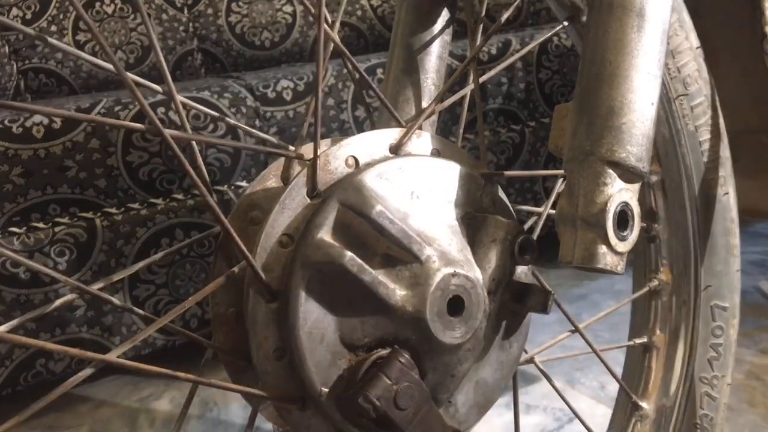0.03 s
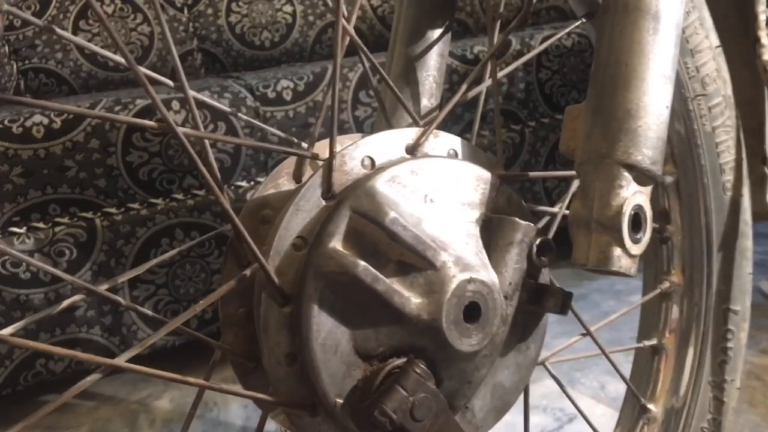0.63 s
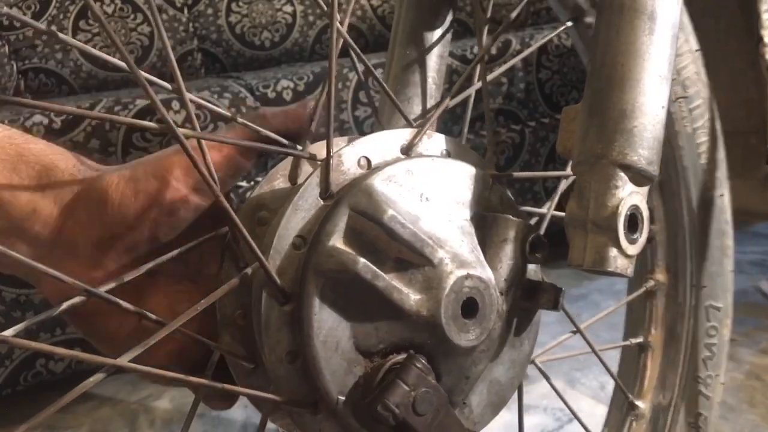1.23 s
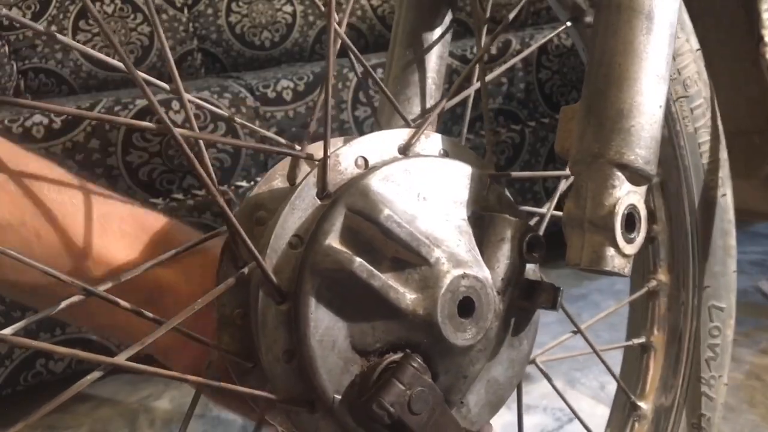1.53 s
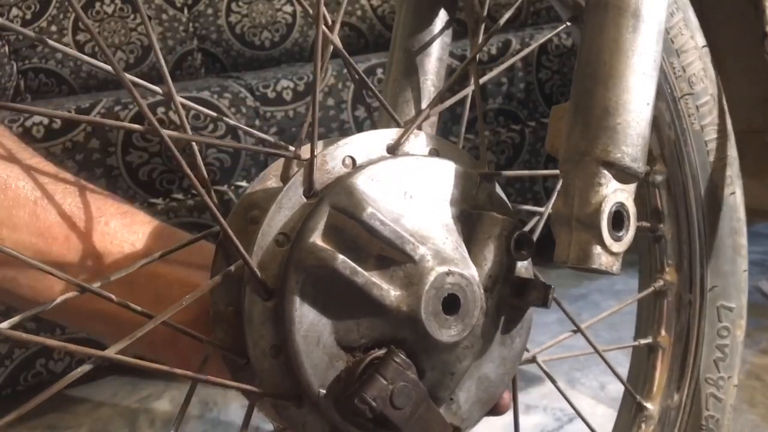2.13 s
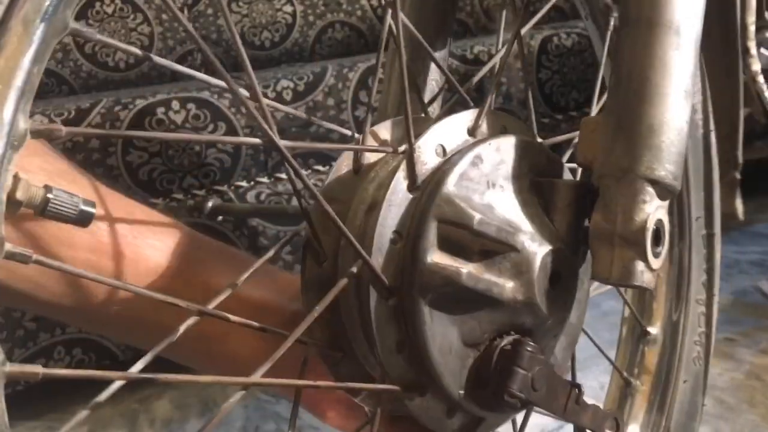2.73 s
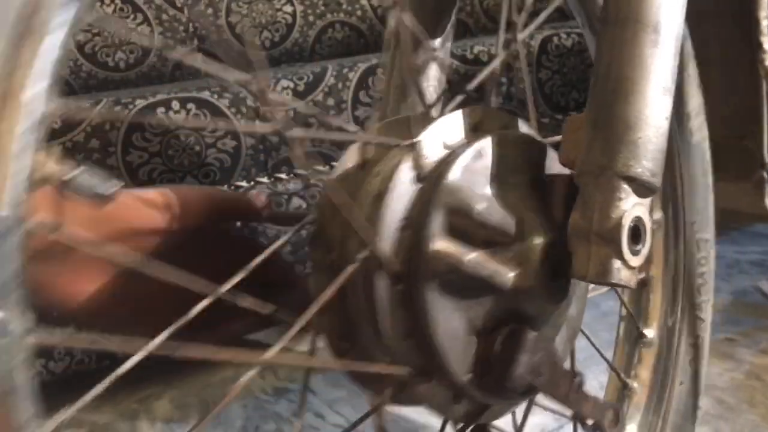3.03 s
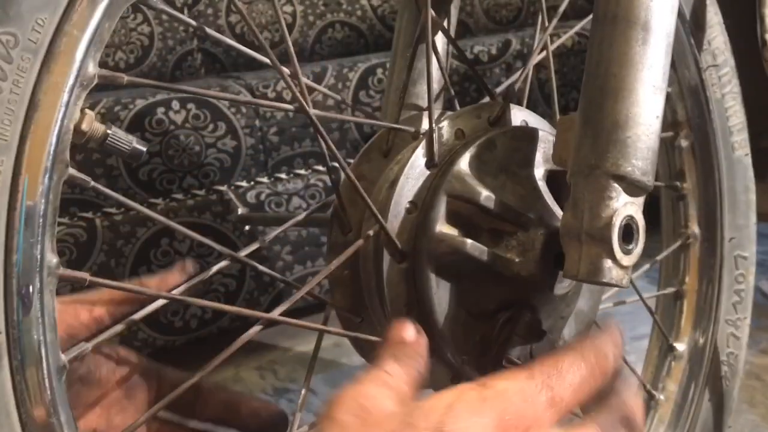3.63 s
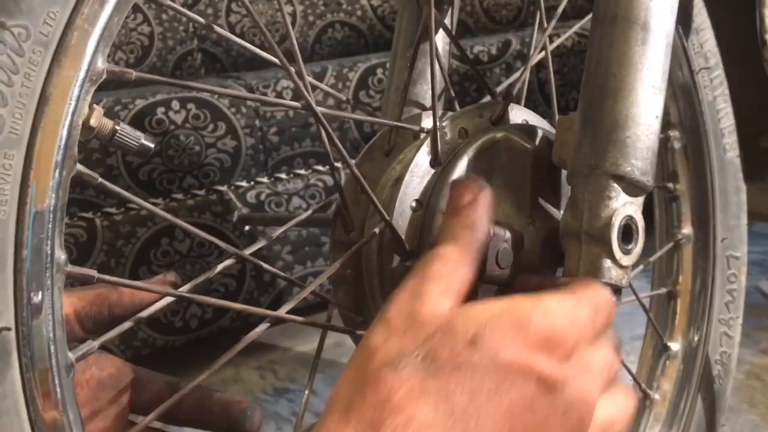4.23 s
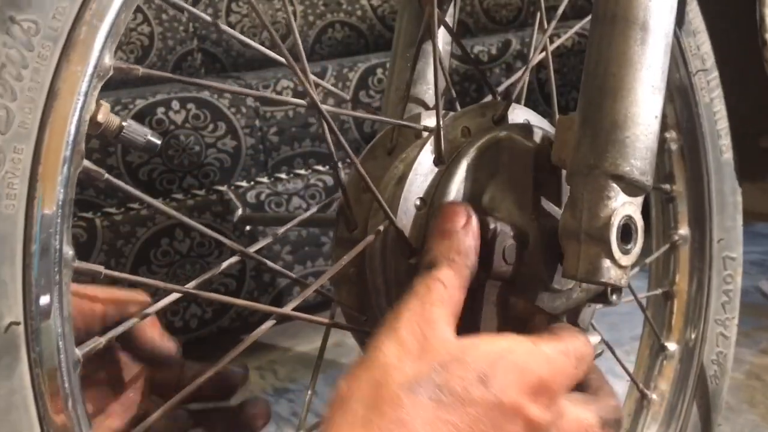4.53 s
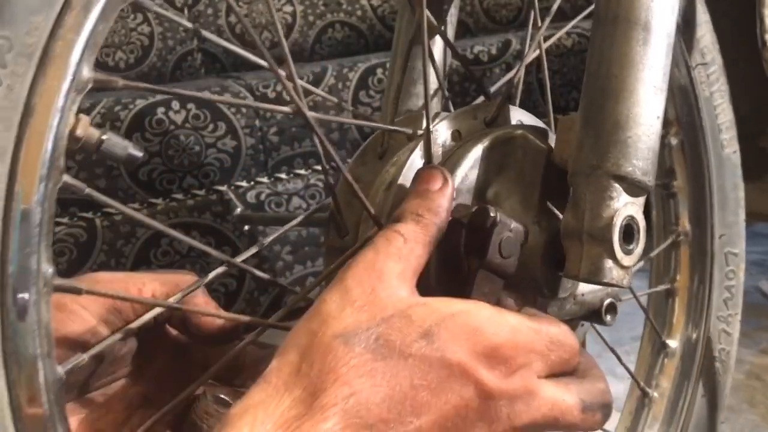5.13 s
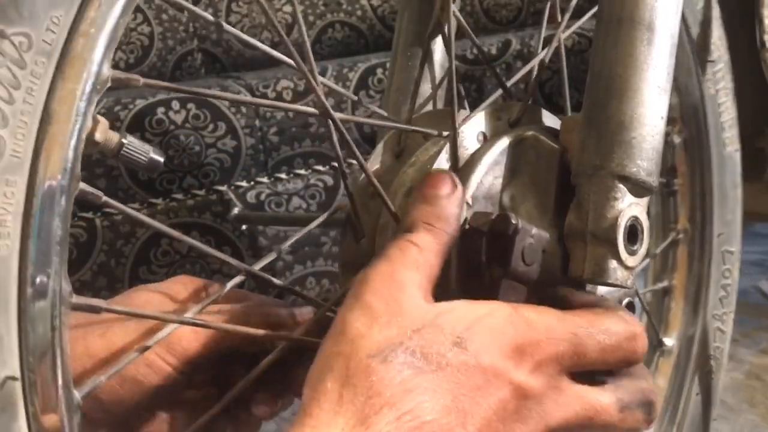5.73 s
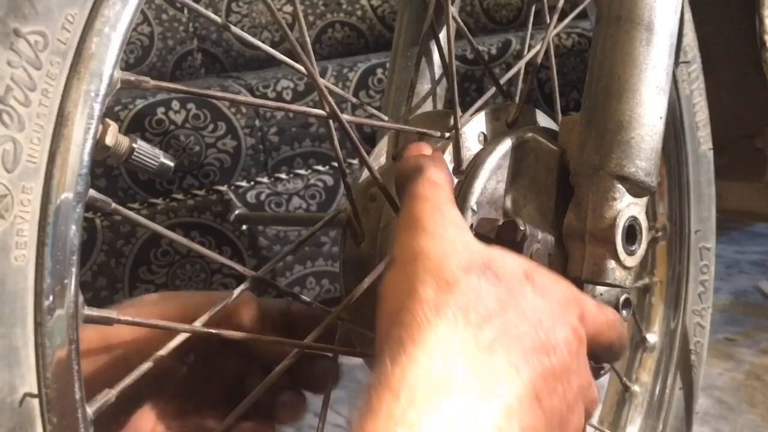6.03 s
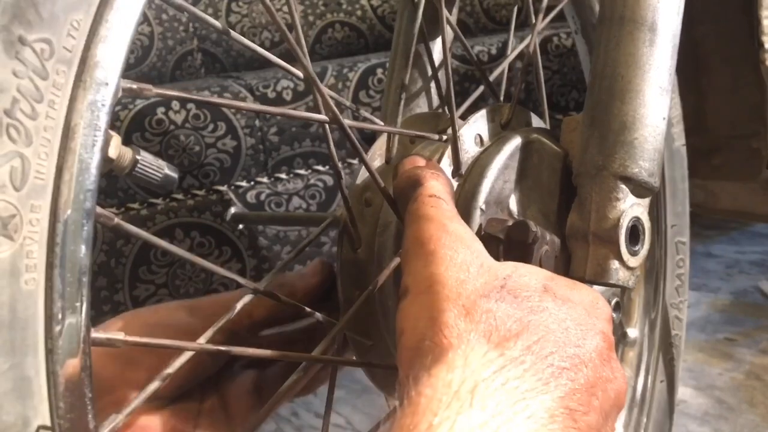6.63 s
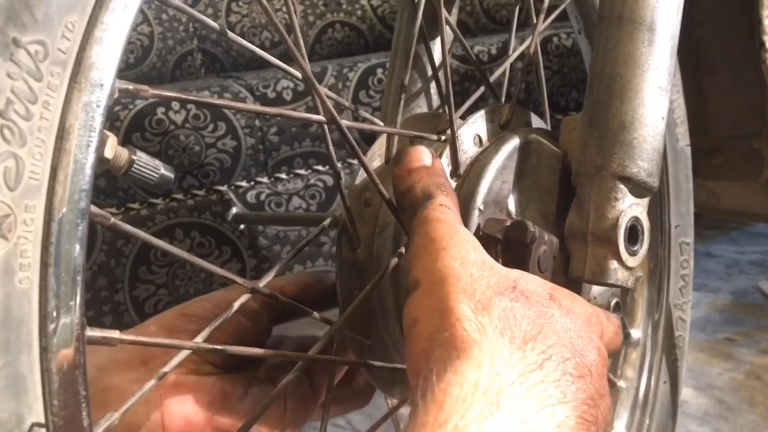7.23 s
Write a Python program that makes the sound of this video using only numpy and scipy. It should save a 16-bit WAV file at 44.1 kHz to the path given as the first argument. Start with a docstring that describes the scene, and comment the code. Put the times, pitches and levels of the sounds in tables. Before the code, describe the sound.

Close up in a small workshop, hands rub softly on a motorcycle wheel while fitting its brake plate. After a quiet start come irregular metallic clicks and clunks, some with a short scrape or a clear ping, and the hub rings faintly behind them. The knocks bunch together past the middle, then thin out to small taps over a low room hum.

```python
"""A small workshop, a phone microphone close to a motorcycle wheel. The drum brake plate is turned and
seated by hand in the hub: each contact scrapes in, rocks the hand-damped plate, thuds through the wheel
and rings the casting. Fingers tick, clear metal tones ping on some contacts and hands rustle on the metal.
The hub rings on faintly, and the near walls answer briefly over a quiet background."""
import sys
import numpy as np
from scipy import signal
from scipy.fft import rfft, irfft
from scipy.io import wavfile
from scipy.ndimage import uniform_filter1d

SR = 44100
rng = np.random.default_rng(int(sys.argv[2]) if len(sys.argv) > 2 else 0)


def output_pcm(signal):
    """Save a mono or channel-first signal as 16-bit PCM at the path in sys.argv[1].

    Samples are clipped to [-1, 1] before scaling.
    """
    pcm = np.clip(np.atleast_2d(signal).T, -1, 1) * 32767
    wavfile.write(sys.argv[1], SR, np.round(pcm).astype(np.int16))


N = 325458
LEAD_S, LENGTH_S = .06, .3  # each contact's sound starts a little before the faces meet
AGE = np.arange(int(LENGTH_S * SR)) / SR - LEAD_S  # seconds since the contact
# The casting's many small modes ripple the spectrum of every rub in the same way.
MODE_SPACING_HZ = 110
RIPPLE = rng.standard_normal(int(SR / 2 / MODE_SPACING_HZ) + 2)

# Contacts of plate, lever and hub. Each row: time in seconds, metal level in dB, brightness in dB per
# octave, scrape-in time and contact t60 in seconds, place along the rim from 0 to 1, rocking pitch in Hz,
# rocking level in dB, hiss in dB. Levels are relative.
KNOCKS = [(0.274, -65, -3, 0.0026, 0.051, .063, 393, -73.5, -59.5),
          (1.9697, -36.5, 3.5, .00025, .026, .438, 535, -34.5, -70),
          (2.1854, -46, -7, .0004, 0.019, .41, 418, -34, -43),
          (2.206, -56.5, 2, 0.0021, 0.038, .244, 480, -50, -48),
          (2.962, -38.5, -5.5, 0.0028, 0.039, .38, 462, -36.5, -36.5),
          (3.139, -73, -4, .0015, .088, .2, 410, -70, -65.5),
          (3.195, -74, -7, .0016, .04, .368, 500, -64, -65),
          (3.236, -66, 2, .002, 0.039, .09, 445, -63, -75),
          (3.479, -57.5, 3, 0.0028, .13, .216, 400, -36, -54),
          (3.7031, -32, -4, .0004, 0.031, .29, 521, -23.5, -50.5),
          (3.771, -49, -5.5, .009, 0.072, 0, 560, -43, -53.5),
          (3.861, -37, 6, .0003, 0.031, .1, 501, -23.5, -41.5),
          (3.919, -57, -1, 0.0015, 0.019, .47, 507, -39, -58.5),
          (4.075, -64.5, -5, .004, .05, .42, 497, -50, -60.5),
          (4.4331, -52, -15, .0015, 0.086, .18, 473, -26.5, -44.5),
          (4.5554, -51.5, -17, .0005, 0.068, .18, 497, -27, -49),
          (4.736, -48.5, -3, 0.00036, 0.042, .146, 456.6, -39, -51.5),
          (4.775, -52, -1.5, 0.0042, .044, .13, 496, -46, -63.5),
          (4.8055, -31, -4.5, .0039, .045, .48, 552, -28, -44),
          (4.8222, -34.5, -7, .0045, .052, .488, 554, -23.5, -51),
          (4.83, -42, -3.5, .001, .018, .3, 545, -31.5, -53.5),
          (4.848, -44, -2.5, .004, .024, .073, 410, -51, -55),
          (4.861, -51, -6, .0015, .035, .3, 582, -34.5, -53),
          (5.0107, -52.5, -21.5, .0008, 0.022, .38, 568, -38, -52.5),
          (5.185, -35.5, -10, .0055, 0.064, .063, 580, -28, -44),
          (5.32, -67, -13, .0038, .043, .15, 572, -62, -72),
          (5.666, -54, -4.5, .0012, 0.11, .26, 458, -26, -51.5),
          (6.4941, -59.5, -2.5, .0025, .037, .178, 492, -43.5, -61),
          (6.998, -57, -3, .002, 0.045, .15, 624, -58, -61),
          (7.194, -61, -2.5, .0019, 0.059, .098, 445, -62, -59)]
# How busily the hands work. Each row: time in seconds, level of their rubbing in dB.
EFFORT = [(.4, -79.5), (1.5, -87), (2.3, -72), (2.8, -84.5), (3.6, -72.5), (4.3, -75.5), (5.2, -75),
          (5.9, -82), (7.3, -78.5)]


def undb(db):
    """Decibels to gain."""
    return 10 ** (np.asarray(db) / 20)


def fade(t, t60):
    """Exponential decay from t = 0."""
    return np.exp(-np.log(1000) * np.maximum(t, 0) / t60)


def band(x, lo_hz, hi_hz, order=3):
    """Causal band-pass."""
    sos = signal.butter(order, [lo_hz, min(hi_hz, SR / 2 - 1)], "band", fs=SR, output="sos")
    return signal.sosfilt(sos, x)


def burst(x, db=0):
    """Scale a short sound to the energy of 20 ms at this level."""
    return x * undb(db) * np.sqrt(.02 * SR / (np.sum(x ** 2) + 1e-18))


def curve(rows):
    """Gain over time from rows of seconds and dB."""
    return undb(np.interp(np.arange(N) / SR, *np.transpose(rows)))


def bump(s, half_s):
    """A smooth swell of height 1 around s."""
    return np.exp(-((np.arange(N) / SR - s) / half_s) ** 2)


def colour(x, points):
    """Shape noise by points of Hz and dB; rms 1."""
    hz, db = np.transpose(points)
    log_hz = np.log(np.fft.rfftfreq(len(x), 1 / SR) + 1)
    y = irfft(rfft(x) * undb(np.interp(log_hz, np.log(hz), db)), len(x))
    return y / y.std()


def add(track, sound, s):
    """Mix in a sound whose contact falls at s."""
    start = int((s - LEAD_S) * SR)
    a, b = max(start, 0), min(start + len(sound), N)
    track[a:b] += sound[a - start:b - start]


def mode(push, hz, t60, phase=0):
    """A resonance that gathers a push and lets it die away."""
    swing = signal.lfilter([1], [1, -fade(1 / SR, t60)], push)
    return swing * np.sin(2 * np.pi * hz * AGE + phase)


def blow(rise_s):
    """Contact force: it builds up, then lets go twice as fast."""
    return np.exp(-np.abs(AGE) / rise_s * np.where(AGE < 0, 1, 2))


def rubbed(size, points, ripple_db=4.8):
    """Noise of this spectrum, heard through the casting's crowded small modes; rms 1."""
    mode_index = np.fft.rfftfreq(size, 1 / SR) / MODE_SPACING_HZ
    gain = undb(ripple_db * np.interp(mode_index, np.arange(len(RIPPLE)), np.clip(RIPPLE, -2, 2)))
    return colour(irfft(rfft(rng.standard_normal(size)) * gain, size), points)


def background(level_db=-66, at_effort_db=-80):
    """Low rumble and hiss, a little louder while the hands are busy."""
    # Room tone. Each row: frequency in Hz, relative level in dB.
    spectrum = [(15, -35), (25, -5.5), (43, 3), (86, 0.5), (129, -10.5), (253, -8.5), (340, -21.5),
                (495, -25.5), (598, -22.5), (1140, -26.5), (1660, -29), (3530, -32), (15500, -30)]
    swell = (curve(EFFORT) / undb(at_effort_db)) ** .45
    return colour(rng.standard_normal(N), spectrum) * undb(level_db) * swell


def lulls():
    """A gain that dips briefly, twice."""
    # Each row: centre and half length in seconds, depth in dB.
    dips = [(0.165, 0.061, -6.5), (6.709, .14, -6)]
    return undb(sum(db * bump(s, half_s) for s, half_s, db in dips))


def workshop(x, early_db=-18, early_s=.016, tail_db=-21, tail_onset_s=.005):
    """A cluster of echoes from the nearest walls, then a short diffuse tail."""
    t = np.arange(SR // 2) / SR
    response = 0
    # Each band: low and high edge in Hz, gain in dB, tail t60 in seconds.
    for lo, hi, db, t60 in [(60, 720, 0, .26), (600, 3600, 0, .23),
                            (2020, 6000, -10, .36), (6000, SR / 2, 1, .36)]:
        early = rng.standard_normal(len(t)) * fade(t - early_s, t60=.085) * (t > early_s)
        tail = rng.standard_normal(len(t)) * fade(t, t60) * (1 - np.exp(-t / tail_onset_s))
        early *= undb(early_db) / np.linalg.norm(early)
        tail *= undb(tail_db) / np.linalg.norm(tail)
        response += undb(db) * band(early + tail, lo, hi)
    return signal.fftconvolve(x, response)[:N]


def room_share(rise_s, loud_db, thud_over_db):
    """A contact's gain into the room: most for sharp, light blows, least for soft or heavy ones."""
    softness = np.log2(rise_s / .001)
    return undb(3 - 2.5 * softness - .3014 * (loud_db + 30) - 1.05 * (thud_over_db + 14))


def hub(x):
    """Hub and spokes ring in sympathy with whatever shakes them."""
    # Each row: frequency in Hz, gain at resonance in dB, t60 in seconds.
    hub_modes = [(503, -32.5, .25), (1000, -26, 0.78), (1700, -28, .3), (2780, -20.5, 0.94),
                 (2650, -18, 0.61), (2990, -21, 0.38), (3330, -19, 0.33), (3470, -20, 0.16),
                 (4640, -24.5, .3)]
    t = np.arange(SR // 2) / SR
    response = 0
    for hz, db, t60 in hub_modes:
        decay = fade(t, t60)
        response += undb(db) * decay * np.sin(2 * np.pi * hz * t) / (decay.sum() / 2)
    return signal.fftconvolve(x, response)[:N]


def rubbing():
    """Strength of the rubbing: steady work, single slides and a shift of grip around every knock."""
    # A hand slides over the metal. Each row: centre and half length in seconds, level in dB.
    slides = [(1.27, 0.046, -79.5), (1.508, 0.026, -76), (1.74, .04, -71), (2.353, .06, -78),
              (3.431, 0.049, -65.5), (4.0, .06, -68.5), (5.626, .04, -71.5), (6.211, .04, -79),
              (7.266, 0.057, -72.5)]
    power = curve(EFFORT) ** 2
    for s, half_s, db in slides:
        power += (undb(db) * bump(s, half_s)) ** 2
    for s, metal_db, *_, rock_db, _ in KNOCKS:
        shift_db = -69.5 + .6 * (max(metal_db, rock_db) + 27)  # more for harder knocks
        power += (undb(shift_db) * bump(s + .03, half_s=.15)) ** 2
    return np.sqrt(power)


def hands(firm_db=-70, rumble_over_db=6.5):
    """Skin slides on metal in uneven grains; firm handling makes the wheel rumble in its fork."""
    effort = rubbing()
    grains = uniform_filter1d(rng.standard_normal(N), size=400)
    slide = rubbed(N, [(100, -13.5), (250, 5.5), (550, 1.5), (1400, -2),
                       (3200, -9.5), (6000, -19), (15000, -24.5)])
    rumble = colour(rng.standard_normal(N),
                    [(15, -7.5), (30, -1.5), (52, 1.5), (100, -8), (160, -22), (400, -48), (2000, -90)])
    load = undb(firm_db + rumble_over_db) * (effort / undb(firm_db)) ** 2.5
    return slide * np.exp(.22 * grains / grains.std()) * effort + rumble * load


def fingers():
    """Fingertips tick on the casting without moving the plate."""
    # Each row: time in seconds, relative level in dB.
    touches = [(.062, -73.5), (.684, -76), (1.579, -83.5), (1.835, -74.5), (1.868, -74.5), (3.403, -73.5),
               (6.351, -76)]
    # A fingertip's clunk, clank, clink and tick, as offsets in dB.
    fingertip_db = [-2, -1, 0, 0.42]
    track = np.zeros(N)
    for s, db in touches:
        tick = casting(rise_s=.003, contact_t60=.062, place=.47, bands_db=np.add(db, fingertip_db))
        add(track, tick, s)
    return track


def metal_pings():
    """Single clear metal tones ring out on some contacts."""
    # Each row: time in seconds, pitch in Hz, level in dB, t60 in seconds.
    pings = [(.685, 1680, -77, .06), (1.9691, 6100, -33, 0.026), (1.9675, 6396, -44, 0.03),
             (1.969, 1452, -26, .028), (1.97, 2823, -32.5, .025), (1.9684, 4320, -42.5, .012),
             (2.962, 3300, -43.5, 0.043), (3.403, 3340, -67.5, 0.05), (3.773, 2700, -49.5, 0.053),
             (3.92, 2660, -66, 0.027), (4.074, 3215, -67.5, 0.061), (4.44, 4600, -62.5, .06),
             (4.555, 2936, -50.5, .03), (4.846, 7000, -59, 0.034), (4.85, 2825, -51, 0.039),
             (5.177, 1018, -37, 0.12), (5.181, 1422, -28.5, 0.068), (6.493, 11550, -61.5, 0.023)]
    track = np.zeros(N)
    for s, hz, db, t60 in pings:
        add(track, burst(mode(blow(rise_s=.0003), hz, t60), db), s)
    return track


def friction(grit):
    """Metal rubs on metal for one contact: rough spots catch and slip."""
    # Each row: frequency in Hz, relative level in dB.
    spectrum = [(400, 3.5), (800, 4), (1500, 1.5), (2100, -3.5), (2900, -5), (4400, -8.5), (5200, -15),
                (6100, -10.5), (7800, -16.5), (10500, -17), (11700, -15.5), (15500, -26.5)]
    catches = uniform_filter1d(rng.standard_normal(len(AGE)), size=40)
    return np.exp(grit * catches / catches.std() - grit ** 2) * rubbed(len(AGE), spectrum)


def hiss(rise_s, db):
    """A hiss swells just before each knock, longer for soft attacks, then fades."""
    lead_s = .0044 + 3.2 * rise_s
    envelope = np.where(AGE < 0, np.exp(-(AGE / lead_s) ** 2), fade(AGE, t60=.14))
    return burst(friction(grit=.3) * envelope, db)


def rattle(lo_hz, hi_hz, t60):
    """A band of noise that starts at the contact and dies away."""
    return band(fade(AGE, t60) * (AGE > 0) * rng.standard_normal(len(AGE)), lo_hz, hi_hz, order=2)


def wheel(rise_s, thud_hz, thud_db, rock_hz, rock_db, rock_t60, yield_s=.00099, lag_s=.00095):
    """The dull part of a contact: the plate rocks, the wheel thuds, the frame sways and shudders."""
    push = np.interp(AGE - lag_s, AGE, blow(yield_s + rise_s / 2))
    grip = np.exp(-(AGE / .038) ** 2)  # the hand closes on the plate and stops it
    chatter = burst(rattle(300, 660, rock_t60), db=-14)
    rocking = burst(burst(grip * mode(push, rock_hz, rock_t60)) + chatter, rock_db)
    thud = burst(band(mode(push, thud_hz, t60=.044), 140, 500, order=2), thud_db)
    sway = burst(mode(push, hz=50, t60=.12), rock_db - 17)
    shudder = burst(rattle(57, 130, t60=.18), rock_db - 18)
    return rocking + thud + sway + shudder


def casting(rise_s, contact_t60, place, bands_db, scrape_db=-30, free_contact_s=.056):
    """The metallic part of a contact: the plate's modes ring and the faces crunch."""
    # Plate and drum. Each row: frequency in Hz, relative level in dB, t60 in seconds at a free contact.
    plate_modes = [(706, 4.5, 0.079), (793, -1, 0.068), (849, -0.5, 0.04), (950, -2.5, 0.057),
                   (991, 3.5, 0.063), (1130, -6.5, 0.039), (1287, -2, .05), (1472, -1, 0.058),
                   (1335, 1.5, .05), (1466, 4.5, 0.051), (1545, -0.5, 0.093), (1668, -2.5, 0.046),
                   (1664, -7.5, 0.06), (1862, 4, 0.058), (2050, -1.5, 0.041), (2166, 3.5, .03),
                   (2496, -1.5, 0.058), (2730, 2.5, 0.16), (2844, 2, 0.086), (2976, -1, 0.099),
                   (3040, 1.5, 0.09), (3090, 1.5, 0.018), (3690, -6.5, 0.024), (4440, -2.5, 0.014),
                   (4520, 5, .03), (5620, -1, 0.042), (5900, -3.5, 0.071), (6950, -2, 0.069),
                   (8750, -4.5, 0.01), (8800, -3, 0.1), (12300, -2, 0.021)]
    # Edges of the clunk, clank, clink and tick bands in Hz.
    edges_hz = [640, 1150, 2100, 6500, 15500]
    crunch_over_ring_db = (-6, -4.5, 2, 5.5)  # higher up the modes crowd together into noise
    settling = fade(AGE, contact_t60) + undb(scrape_db) * fade(AGE, t60=.076)
    crunch = np.where(AGE < 0, blow(rise_s), settling) * friction(grit=.12)
    push = blow(.97 * rise_s)  # the blow is a little quicker than the scrape that leads into it
    ring = metal = 0
    for k, (hz, db, t60) in enumerate(plate_modes, 1):
        shape = .15 + abs(np.sin(np.pi * k * place))  # a mode struck near its node stays weak
        pitch_hz = hz * (1 + .0036 * rng.standard_normal())  # varies at random from knock to knock
        held_t60 = t60 * contact_t60 / free_contact_s  # a firm grip shortens contact and ring alike
        ring += undb(db) * shape * mode(push, pitch_hz, held_t60, phase=rng.uniform(0, 2 * np.pi))
    for lo, hi, db, crunch_db in zip(edges_hz, edges_hz[1:], bands_db, crunch_over_ring_db):
        tone = burst(band(ring, lo, hi, order=1))
        noise = burst(band(crunch, lo, hi, order=1), crunch_db)
        metal += burst(band(tone + noise, lo, hi), db)
    return metal


def brake_plate():
    """The plate knocks on its seat: returns the close sound and what it sends into the room."""
    # The looser the plate sits, the lower it rocks, the sooner it stops and the more the wheel thuds.
    # Each row: rocking in Hz, thud over rocking in dB, ratio of rocking t60 to contact t60, thud in Hz.
    seat = [(392.5, 11, .42, 142), (420, 4, .8, 256), (467.3, -9.5, 1.07, 210), (504, -15, 1.9, 250)]
    # Clunk, clank, clink and tick at neutral brightness, as offsets in dB.
    neutral_db = [-1.5, -0.45, -2.5, -22.5]
    # Octaves over which brightness tilts each of those bands.
    tilt_octaves = [-.85, 0, 1.25, 1.25]
    seat_hz, seat_thud_db, seat_ring, seat_thud_hz = np.transpose(seat)
    direct, sent = np.zeros(N), np.zeros(N)
    for s, metal_db, brightness, rise_s, contact_t60, place, rock_hz, rock_db, hiss_db in KNOCKS:
        bands_db = metal_db + np.array(neutral_db) + brightness * np.array(tilt_octaves)
        thud_hz = np.interp(rock_hz, seat_hz, seat_thud_hz)
        # Harder rocking leaves the thud a smaller share.
        thud_over_db = np.interp(rock_hz, seat_hz, seat_thud_db) - .086 * (rock_db + 35)
        rock_t60 = contact_t60 * np.interp(rock_hz, seat_hz, seat_ring)
        knock = casting(rise_s, contact_t60, place, bands_db) + hiss(rise_s, hiss_db + 2)
        knock += wheel(rise_s, thud_hz, rock_db + thud_over_db, rock_hz, rock_db, rock_t60)
        add(direct, knock, s)
        add(sent, room_share(rise_s, max(metal_db, rock_db), thud_over_db) * knock, s)
    return direct, sent


def scene():
    """The work on the wheel from close by, with the room behind it, in mono."""
    knocks, knocks_sent = brake_plate()
    ticks, pings = fingers(), metal_pings()
    direct = knocks + ticks + pings
    dips = lulls()
    rub = hands() * dips
    # A long rub feeds the hub's narrow modes far better than a damped knock.
    ring = hub(undb(1) * direct + undb(24) * rub)
    room_tone = background() * dips
    echoes = workshop(knocks_sent + undb(2) * ticks + pings)
    return (room_tone + echoes + ring + rub + direct)[None]


def record(dry):
    """The phone cuts the top steeply."""
    top_hz = 15700
    return signal.sosfilt(signal.ellip(10, .2, 70, top_hz, fs=SR, output="sos"), dry)


dry = scene()
out = record(dry)
output_pcm(out)
```